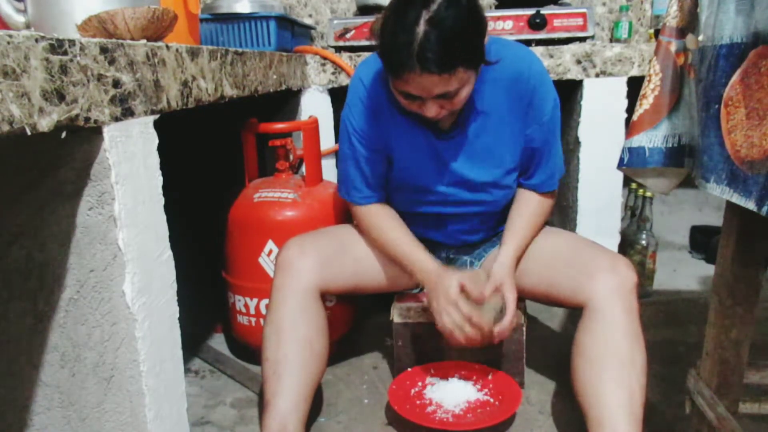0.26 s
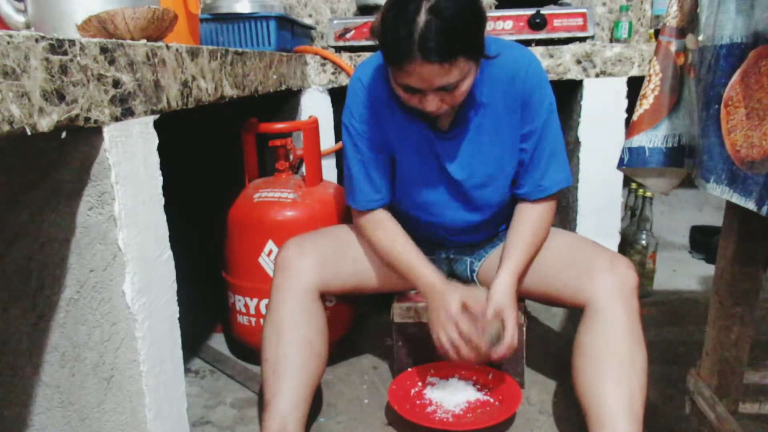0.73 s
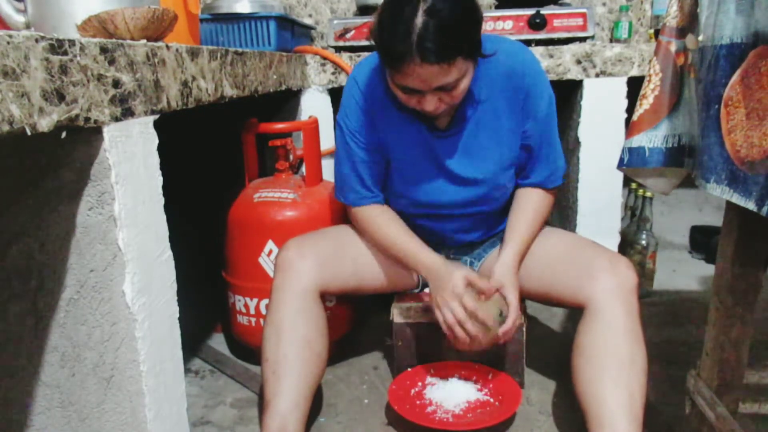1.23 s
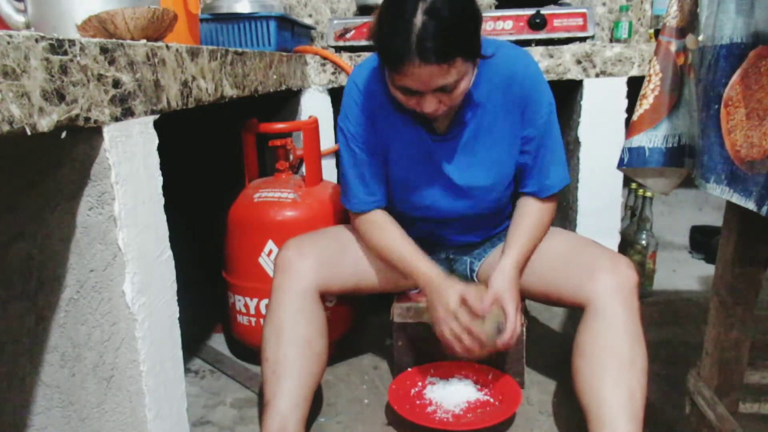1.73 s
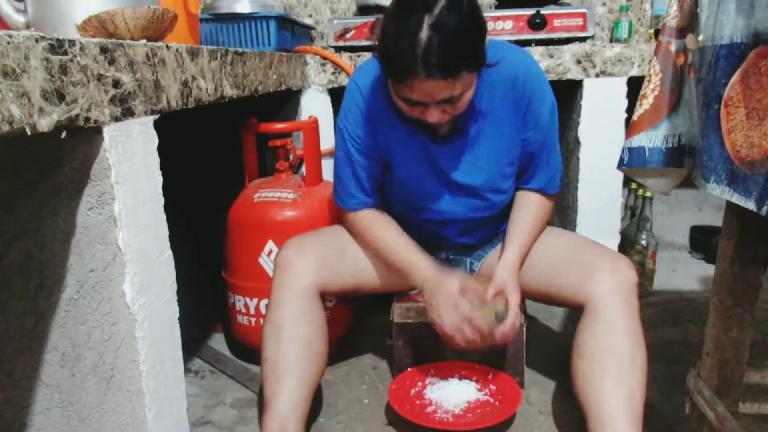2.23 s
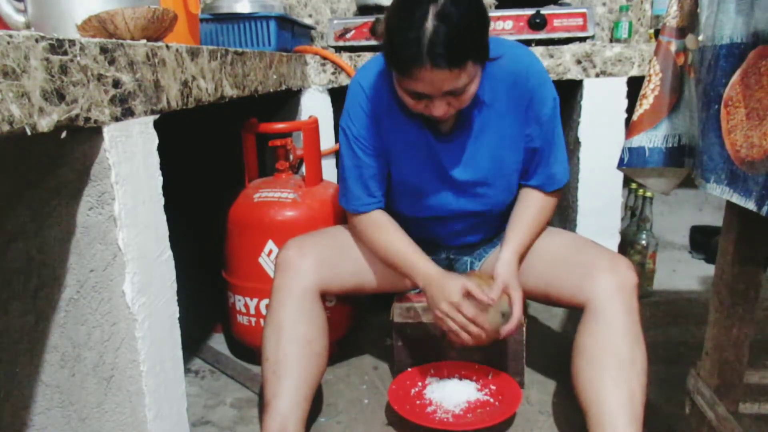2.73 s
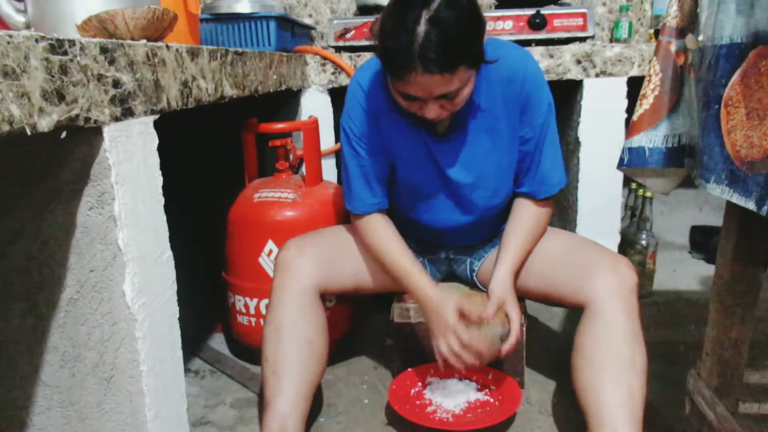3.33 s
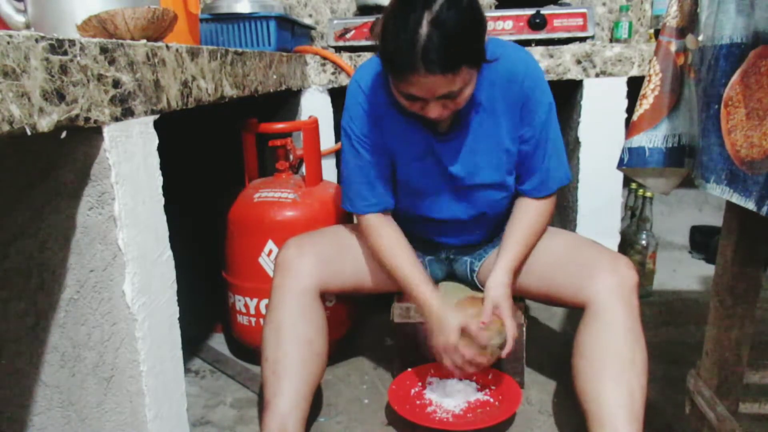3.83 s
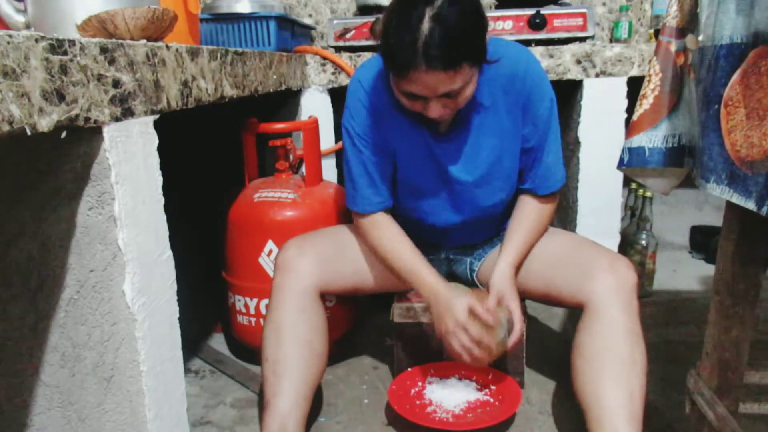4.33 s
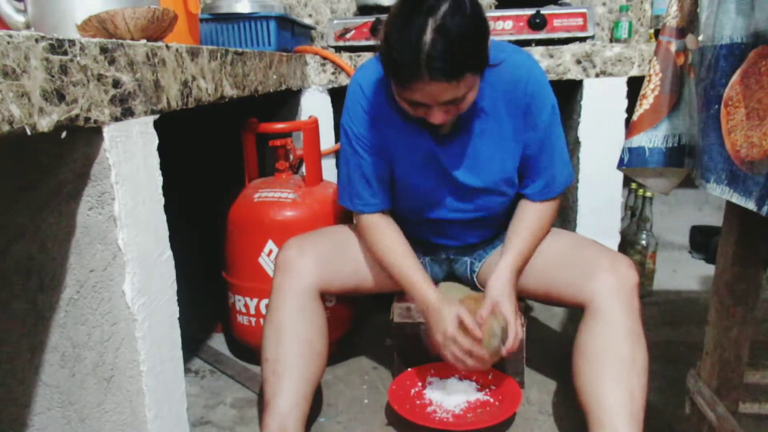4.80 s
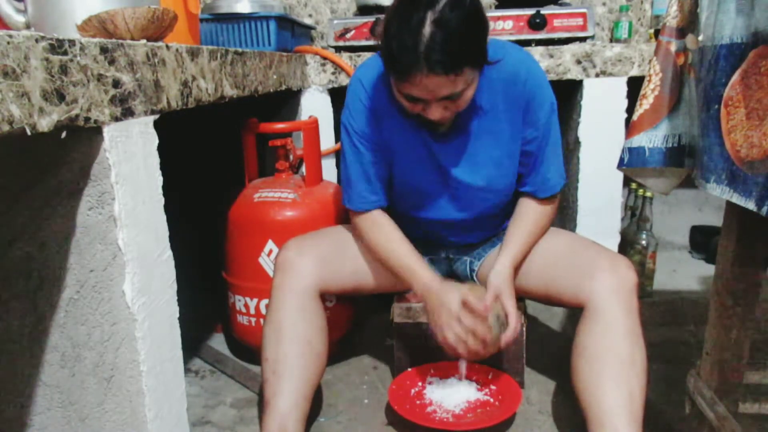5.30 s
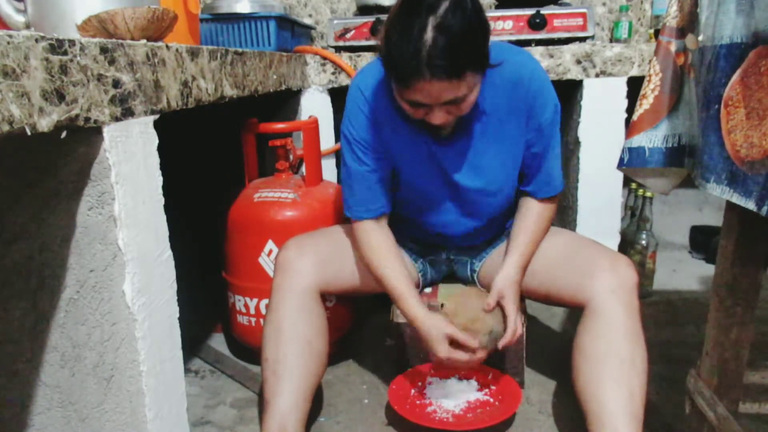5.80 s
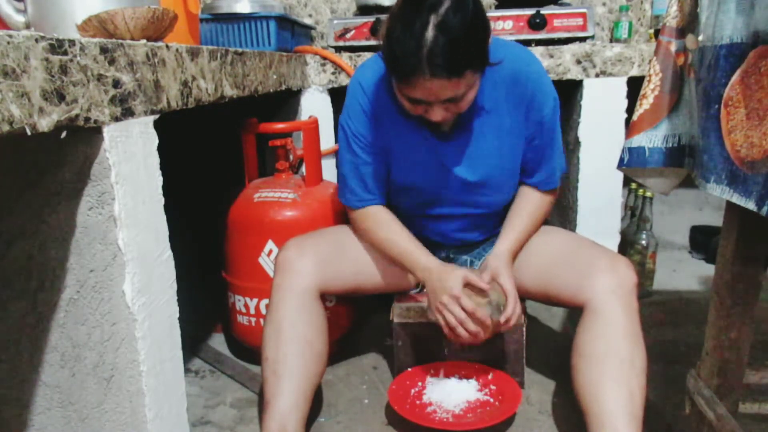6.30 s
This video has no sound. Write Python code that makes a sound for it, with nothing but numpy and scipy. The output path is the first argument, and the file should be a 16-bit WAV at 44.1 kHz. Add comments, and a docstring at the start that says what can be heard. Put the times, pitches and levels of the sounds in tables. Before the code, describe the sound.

In a bare, hard-walled kitchen, a coconut half is scraped on a steel-toothed wooden stool. A light rub comes first, then three quick coarse rasps and a brief turn of the shell, repeated steadily to the end. Some strokes catch with a crack and hollow thud. Short echoes follow each one; a low hum, soft hiss and faint insect chirps lie beneath. Close single-channel pickup by a small microphone.

```python
"""A half coconut is rasped over a toothed steel blade fixed to a wooden stool, in a bare kitchen.
A stroke is just ending; the shell rubs lightly and knocks as it is set back, and a faint insect chirps at times.
Then come three strokes and a turn, over and over: tearing flesh gives dense tiny jolts that ring stool and blade
and hiss in the air; now and then a tooth bites hard, cracks and thuds in the hollow shell.
Sparse echoes of the hard walls carry every stroke on, over a steady low hum and hiss."""
import sys
import numpy as np
from scipy import signal
from scipy.fft import rfft
from scipy.io import wavfile
from scipy.ndimage import uniform_filter1d

SR = 44100
rng = np.random.default_rng(int(sys.argv[2]) if len(sys.argv) > 2 else 0)


def nominal_scale(level):
    """Amplitude ratio for a level in decibels (scalar or array-like)."""
    x = np.asarray(level, float) / 20
    return 10 ** x


def generate_wav(signal):
    """Clip the signal to [-1, 1] and save it as 16-bit WAV at the path in sys.argv[1]."""
    frames = np.transpose(np.atleast_2d(signal))
    scaled = np.clip(frames, -1, 1) * 32767
    pcm = np.round(scaled).astype(np.int16)
    wavfile.write(sys.argv[1], SR, pcm)


N = 288855


def evened(x):
    """Scales to rms 1."""
    return x / np.sqrt(np.mean(x ** 2) + 1e-20)


def read(points, hz):
    """Reads a spectrum table at the given frequencies, linear in log frequency."""
    table_hz, value = np.transpose(points)
    return np.interp(np.log(hz + 1), np.log(table_hz + 1), value)


def ring(hz, db, t60_s):
    """One dying mode; its energy does not depend on how long it rings."""
    t = np.arange(SR // 4) / SR
    wave = nominal_scale(-60 * t / max(t60_s, 0.004)) * np.sin(2 * np.pi * hz * t)
    return nominal_scale(db) * wave / np.linalg.norm(wave)


def colour(points):
    """Causal (minimum-phase) impulse response of energy 1 with the given spectrum."""
    hz = abs(np.fft.fftfreq(2048, 1 / SR))
    log_gain = np.log(nominal_scale(read(points, hz)))
    taps = np.fft.ifft(np.exp(np.conj(signal.hilbert(log_gain)))).real
    return taps / np.linalg.norm(taps)


# modes of stool, blade and shell: (frequency [Hz], relative energy level [dB], t60 [s], 0.004 at least)
BODY_MODES = [(204, -37, 0.091), (259.8, 0, 0.22), (289, 4, 0.11), (334, -8, 0.029), (377, -9, 0.08),
              (440, -16, .07), (457, -29, 0.06), (510, -34, 0.26), (684, -16, 0.18), (718, -13.5, 0.29),
              (786, -6, 0.25), (877, -4.5, 0.047), (903.4, 0, 0.092), (942.3, 3.5, 0.1),
              (1013.5, -13, 0.18), (1150, -9, 0.31), (1255, -17, 0.44), (1480, -15, 0.0093),
              (2060, -20.5, 0.089), (2163, -17.5, 0.057), (2300, -19, 0.076), (2574, -17, 0.089),
              (2725, -15.5, 0.021), (3520, -20.5, 0.0092), (4338, -15, 0.027), (5770, -18.5, 0.0023)]
# spectrum of tearing fibres: (frequency [Hz], relative density [dB per Hz])
HISS_SPECTRUM = [(760, -27), (1300, 6), (1360, -6.5), (1790, -3.5), (2120, -0.5), (3980, -7.5),
                 (4330, -6.5), (5110, -10.5), (8230, -11), (11100, -19), (14100, -18.5), (15500, -25)]
SHELL_HZ, SHELL_T60_S = 417.4, 0.011  # the hollow of the shell
SLAB_HZ, SLAB_DB, SLAB_T60_S = 90, -31.5, 0.058  # stool legs thump faintly on the floor slab
RADIATES_ABOVE_HZ = 237.7  # small parts push little air below this
TEARS_PER_S, FINE_TEARS_PER_S = 3000, 9000


def grating():
    """Strokes, bites and knocks drive one body; the tearing also hisses straight into the air."""
    blade_drive, hiss_drive, stool_drive = pressure()
    pushes, cracks, thuds, ticks = jolts()
    blade = blade_drive * tears(TEARS_PER_S) + pushes
    stool = stool_drive * tears(TEARS_PER_S)
    hiss = hiss_drive * fine_tears(FINE_TEARS_PER_S) + cracks

    low_modes = sum(ring(*mode) for mode in BODY_MODES if mode[0] <= 600)
    high_modes = sum(ring(*mode) for mode in BODY_MODES if mode[0] > 600)
    layers = [
        (stool, low_modes / np.linalg.norm(low_modes)),
        (blade, high_modes / np.linalg.norm(high_modes)),
        (thuds, ring(SHELL_HZ, 0, SHELL_T60_S)),
        (hiss, colour(HISS_SPECTRUM)),
    ]
    sound = ticks + sum(signal.oaconvolve(drive, taps)[:N] for drive, taps in layers)
    radiation = signal.butter(4, RADIATES_ABOVE_HZ, "high", fs=SR, output="sos")
    slab = signal.oaconvolve(stool + thuds, ring(SLAB_HZ, SLAB_DB, SLAB_T60_S))[:N]
    return slab + signal.sosfilt(radiation, sound)


# strokes down the blade: (start [s], rise to full pressure [s], release [s], force on the blade [dB],
# first touch below it [dB], tearing hiss relative to force [dB], weight on the stool relative to force [dB])
STROKES = [(.253,0.05,0.096,-16,24,-7.5,-0.5), (.541,0.078,0.076,-13,23,-10,-5),
           (.836,0.066,0.087,-13.5,21,-9.5,-2), (1.253,0.078,0.061,-12,22,-10.5,-.8),
           (1.526,.1,0.056,-14.5,25,-8.5,-3), (1.806,0.081,0.066,-15,16,-9,-6),
           (2.228,0.049,.082,-15,21,-13.5,-4), (2.524,0.052,0.086,-17,23,-9,-0.5),
           (2.801,0.038,0.087,-17,21,-8,-2), (3.187,.069,.067,-11,13,-14,-2.5),
           (3.478,0.09,0.052,-11,26,-12,-9.5), (3.767,0.09,.03,-15,25,-7,-3.5),
           (4.174,0.073,0.08,-13,22.5,-11,-2.5), (4.451,0.09,0.067,-17,26,-6.5,.6),
           (4.732,.066,.074,-15.5,23,-8,1), (5.106,.088,0.066,-14.5,23,-7.5,0.1),
           (5.394,.061,.08,-14.5,23,-10,-2.5), (5.659,0.046,0.08,-17,24,-6.5,2),
           (6.056,.095,0.054,-14.5,22.6,-7,-2.5), (6.342,0.063,0.092,-13,18,-9.5,-3.5)]
# rows blade, hiss, stool: (share of the swell followed [ratio], level below full pressure at lift-off [dB])
STROKE_DEPTHS = [(0.97, 13.5), (0.71, 13), (0.67, 15)]
# short contacts between strokes: the end of an earlier stroke at 0.0, light rubs, the body of a knock at 4.053:
# (start [s], length [s], force [dB], hiss relative to force [dB], weight on the stool relative to force [dB])
SHORT_CONTACTS = [(0.0, 0.022, -40, -7, 1), (.128, 0.13, -51.5, 3.5, 9), (.215, 0.051, -45, -11, 4),
                  (1.13, 0.13, -47.5, 2, -8), (1.19, 0.1, -36.5, -20, -5), (2.101, .085, -31, -5.5, -3),
                  (3.073, 0.14, -44.5, 2.5, 9), (3.136, 0.16, -32, -11.5, -3.5),
                  (4.053, 0.034, -21, -9.5, -7), (4.999, 0.077, -38, -2, 5), (5.945, 0.085, -41, 0, 5)]
RISE_POWER, RELEASE_POWER = 2.03, 1.52
TOUCH_S, LIFT_S = 0.0055, 0.019
CONTACT_FADE_DB = 10


def pressure():
    """Drives of blade, hiss and stool: strokes touch, swell and release; short contacts touch and fade."""
    t = np.arange(N) / SR
    drives = np.zeros((3, N))
    share, lift_db = np.transpose(STROKE_DEPTHS)[:, :, None]

    def press(start_s, length_s, levels_db, below_db):
        end_s = length_s + LIFT_S
        on = slice(round(start_s * SR), round((start_s + end_s) * SR))
        u = t[on] - start_s
        edges = np.clip(u / TOUCH_S, 0, 1) * np.clip((end_s - u) / LIFT_S, 0, 1)
        drives[:, on] += edges * nominal_scale(np.array(levels_db)[:, None] - below_db(u))

    for start_s, rise_s, release_s, db, touch_db, hiss_db, stool_db in STROKES:
        def below_full_db(u):
            swell = share * touch_db * np.clip(1 - u / rise_s, 0, 1) ** RISE_POWER
            return swell + lift_db * np.clip((u - rise_s) / release_s, 0, 2) ** RELEASE_POWER
        press(start_s, rise_s + release_s, [db, db + hiss_db, db + stool_db], below_full_db)
    for start_s, length_s, db, hiss_db, stool_db in SHORT_CONTACTS:
        press(start_s, length_s, [db, db + hiss_db, db + stool_db], lambda u: CONTACT_FADE_DB * u / length_s)
    return drives


TEAR_SPREAD_DB, FLUTTER_DB = 2.5, 2.5


def tears(per_s):
    """Dense jolts of random sign and size, coming in clumps as the teeth bite and slip."""
    size = nominal_scale(TEAR_SPREAD_DB * np.minimum(rng.exponential(1, N), 4))
    sign = np.sign(rng.standard_normal(N))
    clumps = evened(uniform_filter1d(uniform_filter1d(rng.standard_normal(N), 160), 160))
    happens = rng.random(N) < per_s / SR
    return evened(size * sign * happens * nominal_scale(FLUTTER_DB * clumps))


COLOUR_PATCH_DB = 2.5


def fine_tears(per_s):
    """Finer tearing hiss whose colour varies at random in small patches of time and frequency."""
    z = signal.stft(tears(per_s), nperseg=256, noverlap=192)[2]
    patches = rng.standard_normal(z.shape[::-1]).T
    patches = evened(uniform_filter1d(uniform_filter1d(patches, 6, 0), 10, 1))
    patchy = signal.istft(z * nominal_scale(COLOUR_PATCH_DB * patches), nperseg=256, noverlap=192)[1]
    return evened(patchy[:N])


def sized(grit, shape, hz):
    """Scales a grainy contact so that its strength near hz is what its shape promises."""
    near = abs(np.fft.rfftfreq(len(grit), 1 / SR) / hz - 1) < 0.2
    return grit * np.linalg.norm(shape) / np.sqrt(np.mean(abs(rfft(grit)[near]) ** 2))


# teeth catching hard within a stroke: (time [s], push on the blade [dB], crack of fibres [dB])
BITES = [(0.274, -15, -45), (0.312, -2.5, -26), (0.607, -10, -38), (0.868, -14.5, -31), (0.896, -14, -30),
         (1.275, -15, -20.5), (1.335, -11.5, -29), (1.566, -12.5, -40), (1.868, -5.5, -22),
         (2.265, -9.5, -33), (2.283, -14, -19.5), (2.289, -5, -11), (2.296, -10.5, -23.5), (2.83, -7, -33),
         (3.196, -14, -30), (3.206, -5, -22), (3.238, -8.5, -38), (3.5, -11.5, -45), (3.546, -4.5, -17),
         (3.821, -9, -28), (3.855, -6.5, -30), (4.19, -18.5, -40), (4.236, -16, -25), (4.507, -11, -40),
         (4.771, -15.5, -31), (5.143, -12.5, -35), (5.172, -13.5, -24), (5.447, -9.5, -43),
         (5.713, -19, -28), (6.087, -10.5, -30.5), (6.162, -11, -15), (6.402, -13, -22)]
# the shell set back on the blade: (time [s], push on the blade [dB], crack [dB], hollow thud [dB])
KNOCKS = [(0.128, -43, -40, -32), (1.132, -33, -34.5, -32), (2.107, -30, -40, -27),
          (2.154, -30, -31, -25.5), (4.054, -13.5, -22, -16.5), (4.971, -42, -34, -51),
          (5.004, -30, -37, -21), (5.946, -37, -36, -29.5)]
BITE_THUD_DB = -9.5  # the hollow shell answers each bite, relative to the push
PUSH_RISE_S, CRACK_RISE_S = 0.0039, 0.0014
TICK_HZ, TICK_DB, TICK_DECAY_S, TICK_RISE_S = 2470, 0.5, 0.0012, 0.00043  # level relative to the crack
KNOCK_DULL_HZ = 4500  # a knock cracks duller than a bite
BLADE_HZ = 950  # where the blade rings most


def jolts():
    """Grainy contacts of a few ms: each pushes the blade, cracks, thuds in the shell and ticks a tooth."""
    events = KNOCKS + [(s, db, crack_db, db + BITE_THUD_DB) for s, db, crack_db in BITES]
    u = np.arange(800) / SR
    push, crack = ((u / rise_s * np.exp(1 - u / rise_s)) ** 2 for rise_s in (PUSH_RISE_S, CRACK_RISE_S))
    tick = nominal_scale(TICK_DB) * np.sin(2 * np.pi * TICK_HZ * u)
    tick *= np.exp(-u / TICK_DECAY_S) * (1 - np.exp(-u / TICK_RISE_S))
    dull = signal.butter(4, KNOCK_DULL_HZ, fs=SR, output="sos")
    pushes, cracks, thuds, ticks = np.zeros((4, N))
    for i, (s, push_db, crack_db, thud_db) in enumerate(events):
        push_noise, crack_noise = rng.standard_normal((2, 800))
        if i < len(KNOCKS):
            crack_noise = signal.sosfilt(dull, crack_noise)
        span = slice(round(s * SR), round(s * SR) + 800)
        pushes[span] += nominal_scale(push_db) * sized(push_noise * push, push, BLADE_HZ)
        thuds[span] += nominal_scale(thud_db) * sized(push_noise * push, push, SHELL_HZ)
        cracks[span] += nominal_scale(crack_db) * crack_noise * crack
        ticks[span] += nominal_scale(crack_db) * tick
    return pushes, cracks, thuds, ticks


# decay of the echoes: (frequency [Hz], t60 [s])
WALL_DECAY = [(150, 0.33), (300, 0.29), (600, 0.31), (1040, 0.28), (2760, 0.33), (7280, 0.26),
              (14000, 0.24)]
TAIL_STEPS_PER_S = 47


def walls(x, count=8):
    """Sparse random echoes, dying band by band; several tails crossfade in turn, evening out the room's colour."""
    out = np.zeros(N)
    turn = np.arange(N) / SR * TAIL_STEPS_PER_S % count
    for k in range(count):
        taps = np.zeros(SR // 2)
        at = np.arange(160, SR // 2 - 20, 20)
        taps[at + rng.integers(0, 20, len(at))] = rng.choice([-1., 1.], len(at))
        hz, t, z = signal.stft(taps, SR, nperseg=256)
        decay_db = -60 * t / read(WALL_DECAY, hz)[:, None]
        tail = signal.istft(z * nominal_scale(decay_db), SR, nperseg=256)[1]
        away = np.minimum(abs(turn - k), count - abs(turn - k))
        share = np.cos(np.pi / 2 * np.minimum(away, 1))  # equal-power crossfade
        out += signal.oaconvolve(x * share, tail / np.linalg.norm(tail))[:N]
    return out


# insect chirps: (start [s], length [s], level [dB])
CHIRPS = [(0.037, 0.11, -56), (0.227, 0.031, -55), (1.76, 0.073, -55), (1.98, 0.14, -60),
          (2.744, 0.047, -59), (3.97, .06, -58), (4.12, 0.094, -56)]
CHIRP_HZ, CHIRP_POLE_WIDTH_HZ, CHIRP_BEATS_PER_S = 4900, 600, 60


def insect():
    """Noise through two equal resonant poles makes a fuzzy high band, throbbing, in short chirps."""
    t = np.arange(N) / SR
    level = np.zeros(N)
    for s, length_s, db in CHIRPS:
        level += nominal_scale(db) * np.clip(4 * (1 - abs(2 * (t - s) / length_s - 1)), 0, 1)
    r = np.exp(-np.pi * CHIRP_POLE_WIDTH_HZ / SR)
    noise = rng.standard_normal(N) + 1j * rng.standard_normal(N)
    fuzz = signal.lfilter([1], np.convolve([1, -r], [1, -r]), noise)
    band = evened((fuzz * np.exp(2j * np.pi * CHIRP_HZ * t)).real)
    throb = 1 + 0.27 * np.cos(2 * np.pi * CHIRP_BEATS_PER_S * t)
    return level * throb * band


# quiet of the house: (frequency [Hz], relative density [dB per Hz])
AIR_SPECTRUM = [(15, -35), (25, -28), (86, 3), (140, -8), (267, 2), (399, -5), (1140, -8.5), (3720, -21),
                (5010, -22), (6050, -19.5), (12500, -26.5), (15500, -41)]
AIR_DB, AIR_PATCH_DB = -48, 0.96


def air():
    """Steady low hum and hiss: random spectra, drifting in small patches of time and frequency."""
    hz = np.fft.rfftfreq(2048, 1 / SR)
    real, imag, patches = rng.standard_normal((N // 512 + 5, 1025, 3)).T
    patches = evened(uniform_filter1d(uniform_filter1d(patches, 12, 0), 8, 1))
    z = (real + 1j * imag) * nominal_scale(read(AIR_SPECTRUM, hz)[:, None] + AIR_PATCH_DB * patches)
    return nominal_scale(AIR_DB) * evened(signal.istft(z, nperseg=2048, noverlap=1536)[1][:N])


DIRECT_DB, WALLS_DB = -3.5, -7


def scene():
    """Grater, its echoes, insect and quiet, in one channel."""
    near = grating()
    mix = nominal_scale(DIRECT_DB) * near + nominal_scale(WALLS_DB) * walls(near) + insect() + air()
    return mix[None]


def top_cut(x):
    """Nothing passes above the cut-off."""
    return signal.sosfilt(signal.butter(12, 15710, fs=SR, output="sos"), x)


CAPSULE_HZ, CAPSULE_WIDTH_HZ, CAPSULE_DB = 14050, 800, 7.0
VENT_HZ, EDGE_HZ = 48, 15280
CEILING = 0.95  # of full scale


def record(dry):
    """The small capsule rings near the top of its band; peaks round off below full scale; treble is cut."""
    resonance = signal.lfilter(*signal.iirpeak(CAPSULE_HZ, CAPSULE_HZ / CAPSULE_WIDTH_HZ, SR), dry)
    # the capsule's vent lets the deepest bass escape
    vent = signal.butter(2, VENT_HZ, "high", fs=SR, output="sos")
    x = signal.sosfilt(vent, dry + (nominal_scale(CAPSULE_DB) - 1) * resonance) / CEILING
    rounded = CEILING * x / (1 + x ** 4) ** 0.25
    taps = signal.firwin(511, EDGE_HZ, window=("kaiser", 9), fs=SR)
    finished = signal.oaconvolve(rounded, taps[None], "same")
    return top_cut(finished)


dry = scene()
out = record(dry)
generate_wav(out)
```